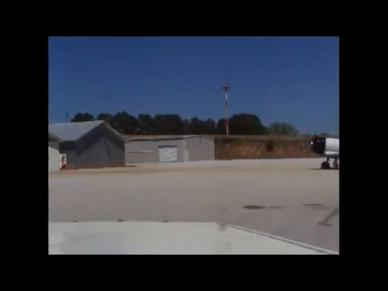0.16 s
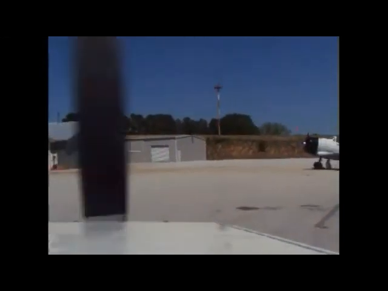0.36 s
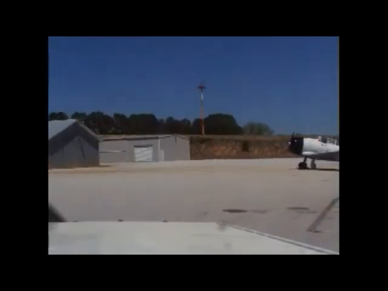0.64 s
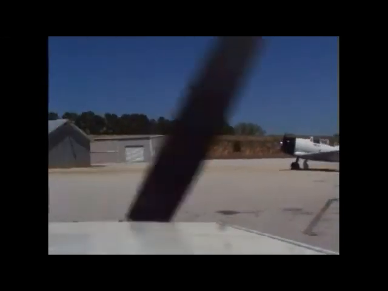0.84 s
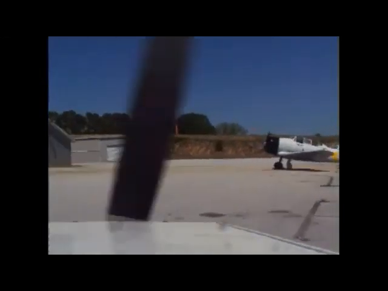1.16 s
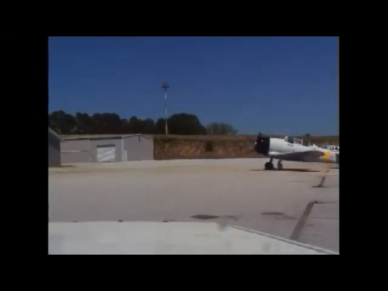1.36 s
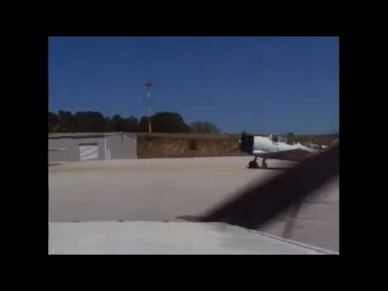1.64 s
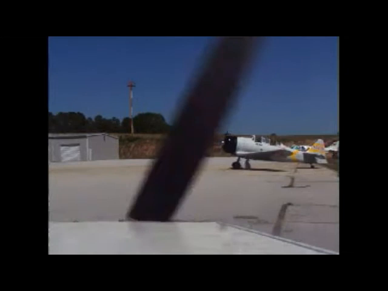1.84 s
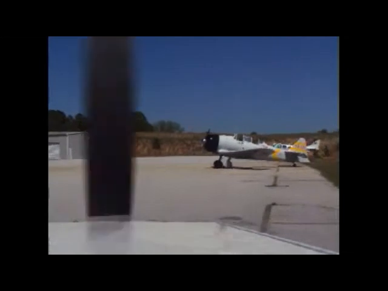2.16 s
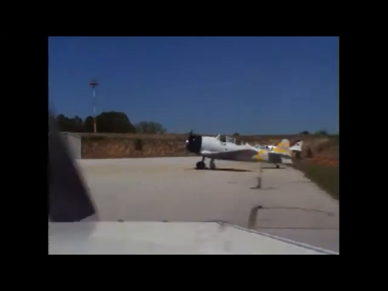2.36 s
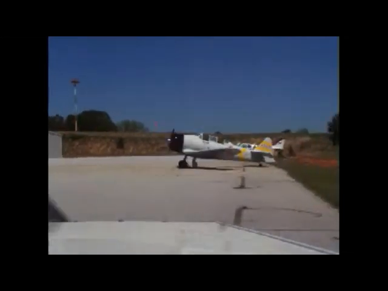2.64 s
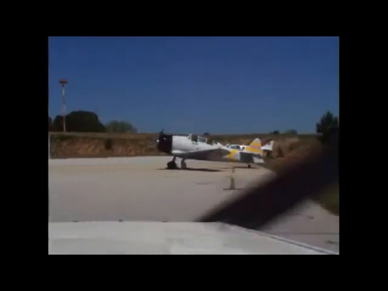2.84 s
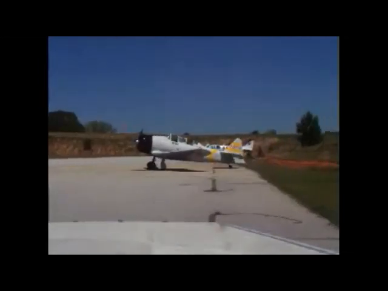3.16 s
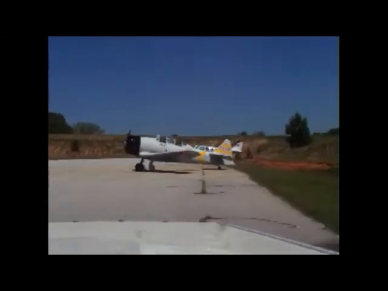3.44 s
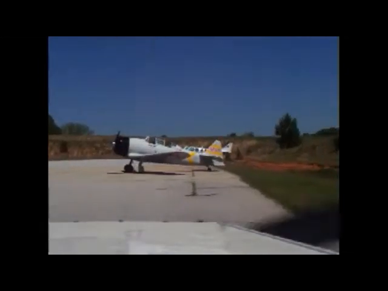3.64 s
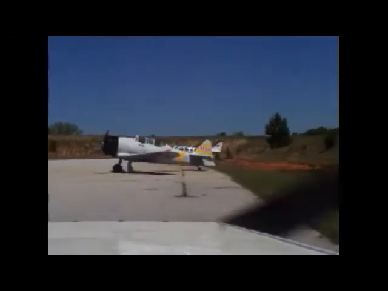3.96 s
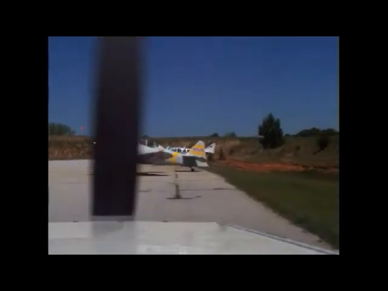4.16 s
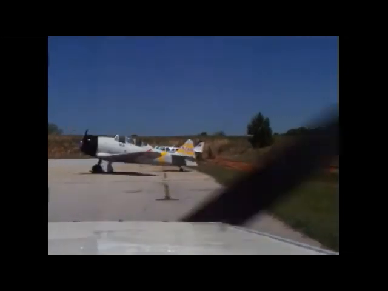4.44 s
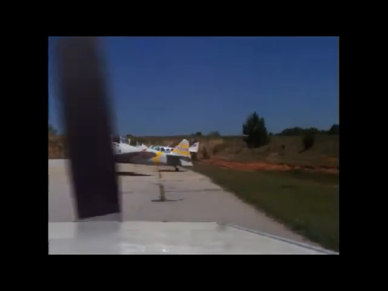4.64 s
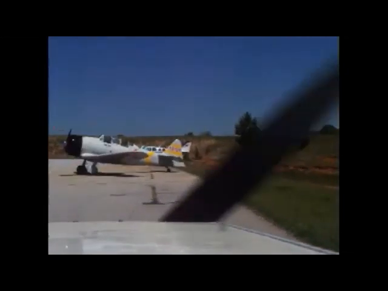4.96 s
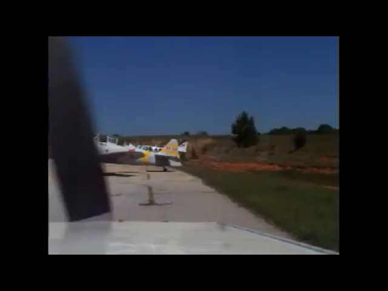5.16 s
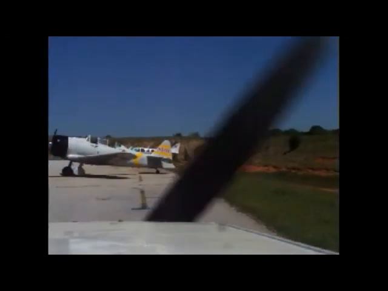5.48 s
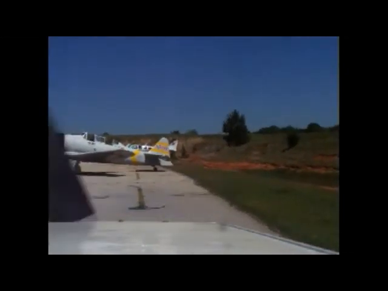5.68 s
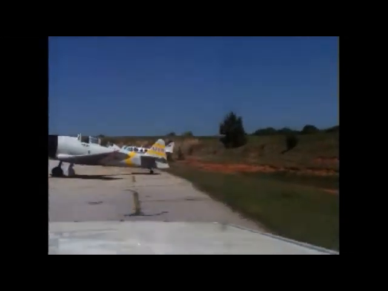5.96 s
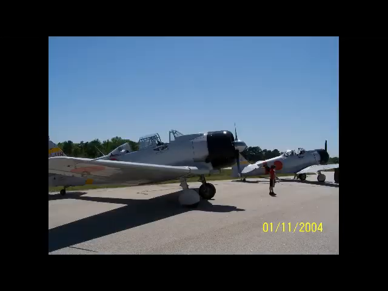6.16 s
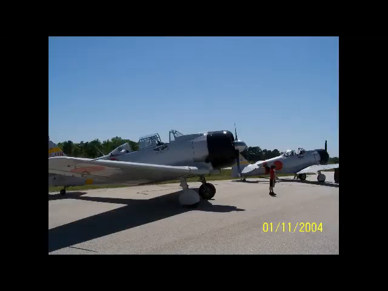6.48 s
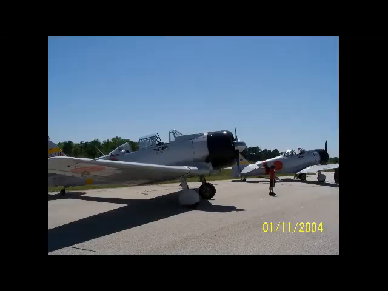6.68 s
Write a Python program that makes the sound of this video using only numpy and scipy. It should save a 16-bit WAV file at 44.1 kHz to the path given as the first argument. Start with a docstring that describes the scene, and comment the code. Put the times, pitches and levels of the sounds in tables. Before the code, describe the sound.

Inside a small aircraft's cabin, a four-cylinder engine runs at low taxi power, heard close through a small camera microphone. It chugs roughly, ringing pipes and buzzing panels over gassy propeller roar, with a sharp metallic clack about ten times a second. Its speed rises slightly at first, then holds steady until everything cuts to silence just after six seconds.

```python
"""Cabin of a small aircraft, heard at close range through a small camera's microphone.
Its four-cylinder engine idles at taxi power and gathers a little speed, then the sound stops dead.
One engine cycle is two shaft turns and repeats almost unchanged. Sine orders make the hum and throb,
decaying tones the ringing pipes and panels, shaped noise the gas and propeller roar,
and short bursts of random-signed noise in resonant metal the valve clacks."""
import sys
import numpy as np
from scipy import signal
from scipy.fft import rfft, irfft, next_fast_len
from scipy.io import wavfile
from scipy.ndimage import uniform_filter1d, map_coordinates

SR = 44100
rng = np.random.default_rng(int(sys.argv[2]) if len(sys.argv) > 2 else 0)


def waveform_to_disk(signal):
    """Save audio, clipped to [-1, 1], as 16-bit WAV at the path in sys.argv[1]."""
    frames = np.transpose(np.atleast_2d(signal))
    scaled = np.clip(frames, -1, 1) * 32767
    samples = np.round(scaled).astype(np.int16)
    wavfile.write(sys.argv[1], SR, samples)


N = 300409

# Mean engine speed: [t/s, cycle rate f/Hz]
ENGINE_SPEED = [(0.0, 9.121), (0.6, 9.296), (1.2, 9.424), (2.0, 9.519), (3.0, 9.597), (4.0, 9.643),
                (5.0, 9.652), (6.1, 9.639)]
# Low exhaust and propeller orders at settled speed: [multiple of the cycle rate, relative level/dB]
ORDERS_SETTLED = [(1, -31), (2, -18.5), (3, -18.5), (4, -4.5), (5, -6.5), (6, -12), (7, -0.5), (8, -3.5),
                  (9, -2), (10, -20), (11, 1), (12, -10.5), (13, -6), (14, -9), (15, 1), (16, -4),
                  (17, 2.5), (18, -13), (19, -10.5), (20, 1), (21, -4), (22, -10), (23, -21.5), (24, -6.5),
                  (25, -8), (26, -8), (27, -12.5), (28, -2), (29, -9), (30, -19.5), (31, -14.5),
                  (32, -16.5), (33, -28.5), (34, -14)]
# The same orders while the engine gathers speed: [multiple of the cycle rate, relative level/dB]
ORDERS_SLOW = [(1, -30.5), (2, -28.5), (3, -20.5), (4, -1), (5, -7.5), (6, -15), (7, -8.5), (8, -2.5),
               (9, 0), (10, -18.5), (11, -8.5), (12, 5), (13, -10.5), (14, -4.5), (15, 1.5), (16, 1.5),
               (17, 0.5), (18, -16), (19, -1), (20, -4.5), (21, -4.5), (22, -17), (23, -16.5), (24, -8.5),
               (25, -9), (26, -16), (27, -5.5), (28, 0.5), (29, -15), (30, -17.5), (31, -24.5), (32, -19),
               (33, -20), (34, -12.5)]
# Passage from the slow to the settled balance of orders: [t/s, share 0-1]
BALANCE_SHIFT = [(1.8, 0), (3.6, 1)]
# Pipes and panels, each sounded once a cycle:
# [place of the peak in the cycle 0-1, f/Hz, level before the engine level/dB, rise to the peak t/ms]
PIPES_AND_PANELS = [(.02, 500, -1, 3), (.085, 420, 5, 5), (.128, 500, -3, 2.5), (.23, 460, -2, 4.5),
                    (.34, 488, 5.5, 5), (.46, 500, -3, 3), (.55, 480, 4, 4), (.625, 425, 1.5, 4.5),
                    (.775, 428, 1.5, 4), (.83, 490, 1.5, 3.5), (.92, 425, .5, 4), (.31, 660, -3.5, 8),
                    (.392, 600, -9, 3.5), (.585, 660, -6, 6.5), (.80, 662, -10, 5), (.49, 740, -9, 5),
                    (.80, 742, -12, 5), (.055, 930, -6, 4), (.30, 935, -9, 5), (.575, 925, -2.5, 6),
                    (.815, 925, -5, 5), (.012, 1150, -7.5, 3.5), (.085, 1225, -5, 3.2),
                    (.165, 1205, -6, 3.5), (.26, 1170, -6, 3), (.307, 1140, -4, 3.5), (.523, 1170, -9, 2.2),
                    (.595, 1205, -3.5, 3.5), (.8156, 1197, 2.5, 6.5), (.88, 1235, -6, 3),
                    (.779, 1197, 8, .2), (.548, 1000, 2, .25), (.303, 1000, 2, .25), (.002, 1420, -8, 2),
                    (.072, 1370, -8, 3), (.215, 1450, -10, 2.3), (.56, 1370, -3.5, 2.8),
                    (.77, 1380, -10, 2), (.825, 1460, -11, 2), (.68, 1400, -12, 2), (.02, 1800, -14, 2),
                    (.12, 1800, -10, 1.7), (.228, 1780, -5.5, 2.4), (.46, 1730, -13, 3),
                    (.55, 1600, -10, 2.5), (.608, 1740, -9, 2), (.82, 1735, -10, 3), (.12, 1520, -11, 1.5),
                    (.02, 2600, -15, 3), (.235, 2550, -15, 3), (.488, 2600, -12, 1.2),
                    (.553, 2460, -6.5, 2.2), (.597, 2460, -6.5, 2), (.615, 2660, -8.5, 1.8),
                    (.66, 2660, -11, 1.6), (.74, 2570, -14, 1.5), (.78, 2460, -11, 2.5),
                    (.995, 3450, -11, 1.7), (.05, 3460, -11.5, 2), (.48, 3440, -14.5, 2),
                    (.555, 3450, -15, 1.8)]
# Weak firings of the loudest cylinder: [t/s, level change/dB]
WEAK_FIRINGS = [(2.28, -9), (2.385, -3.5)]
# Broad spectrum of gas and propeller wash: [f/Hz, relative density level/dB per Hz]
ROAR_SPECTRUM = [(15, -39.5), (32, -23.5), (60, -14.5), (160, -16.5), (300, -16.5), (460, -10.5),
                 (830, -18.5), (1100, -16.5), (1600, -23), (2500, -25), (4160, -35.5), (5700, -29.5),
                 (8200, -48.5), (15000, -64)]
# Cabin resonances and hollows in the roar: [f/Hz, width f/Hz, level change/dB]
CABIN_RESONANCES = [(152, 55, 3.5), (268, 20, 2.5), (330, 40, -4), (415, 60, 3), (565, 40, 6),
                    (632, 30, -5), (660, 20, 3), (705, 30, -6), (860, 70, -6), (925, 50, 4), (1195, 39, 5),
                    (1280, 30, -14), (1360, 69, 6), (1505, 40, 6), (1728, 44, 8), (1840, 40, -5),
                    (2010, 70, 3), (2370, 50, -5), (2460, 60, 6), (2590, 50, -5), (2665, 70, 6),
                    (3340, 70, 4.5), (3420, 40, -4), (3510, 79, 4.5), (4900, 60, 4), (4960, 30, -6),
                    (5010, 40, 6), (5200, 120, 4), (5340, 120, -4), (5600, 200, 5.5), (6080, 120, 4),
                    (6820, 60, -4), (6940, 220, 9)]
# How much of the roar comes alike in the next cycle: [f/Hz, power share 0-1]
REPEATING_SHARE = [(30, .1), (320, .15), (420, .25), (800, .25), (1200, .15), (2000, .1), (4000, .05)]
# Modes of the cylinder-head metal: [f/Hz, width f/Hz, level/dB]
METAL_MODES = [(3370, 180, -2), (4130, 120, -8), (4780, 330, -5.5), (5180, 140, 1.5), (5636, 210, 3),
               (5920, 530, -5), (6950, 230, -9)]
# Faint valve seatings in every cycle: [place in the cycle 0-1, drive level/dB, scatter level/dB]
FAINT_SEATINGS = [(.21, -23, 2.5), (.455, -24, 2.5), (.71, -28, 2.5)]
# Valve seatings that stand out: [t/s, peak level before the drive gain/dB]
LOUD_SEATINGS = [(0.0667, -14), (0.0942, -26), (0.175, -12.5), (0.2573, -25), (0.286, -14.5), (0.3127, -26),
                 (0.392, -15.5), (0.502, -15), (0.6095, -18), (0.7183, -14.5), (0.823, -20), (0.9292, -13),
                 (1.038, -13), (1.063, -25), (1.1438, -12.5), (1.1697, -27.5), (1.1962, -28), (1.2221, -23),
                 (1.251, -12), (1.3558, -17), (1.4621, -17), (1.4875, -20), (1.5135, -24.5),
                 (1.5678, -13.5), (1.5928, -20.5), (1.62, -24), (1.6727, -14), (1.7003, -18),
                 (1.778, -15.5), (1.8831, -15), (1.9876, -13), (2.0133, -24), (2.094, -17.5), (2.198, -13),
                 (2.3027, -15), (2.4082, -12), (2.4339, -22), (2.5122, -14.5), (2.5366, -30.5),
                 (2.5646, -28), (2.617, -14), (2.7216, -13.5), (2.7482, -21.5), (2.8272, -11.5),
                 (2.8509, -17.5), (2.9306, -11.5), (3.0353, -14), (3.1385, -16.5), (3.243, -12),
                 (3.3476, -15.5), (3.3727, -28), (3.452, -13.5), (3.5543, -16.5), (3.6594, -15),
                 (3.7638, -14.5), (3.8137, -25), (3.8675, -12.5), (3.9704, -15.5), (4.072, -15),
                 (4.0991, -21.5), (4.1265, -24.5), (4.1789, -13.5), (4.2817, -16.5), (4.3865, -14),
                 (4.438, -22.5), (4.4892, -16), (4.592, -18.5), (4.696, -11), (4.7997, -14.5),
                 (4.903, -17.5), (4.9282, -27), (5.008, -12), (5.0838, -26.5), (5.11, -15), (5.214, -14.5),
                 (5.3185, -12), (5.4212, -13), (5.4485, -23.5), (5.4799, -26), (5.5267, -12),
                 (5.628, -14.5), (5.7064, -27), (5.7324, -19.5), (5.8062, -25), (5.836, -14.5),
                 (5.941, -12), (5.9668, -30), (6.0437, -19)]
# Microphone and anti-alias filter: [f/Hz, level/dB]
MICROPHONE_RESPONSE = [(8, -30), (25, 0), (8250, -1.5), (8550, -16.5), (8700, -26.5), (8950, -30.5),
                       (9200, -13), (11000, -15), (12000, -26)]

START_CYCLE = -.6325  # cycle count at time zero; the loud valve seats near whole counts
ENGINE_DB, ENGINE_SAG_DB_PER_S = -16, 0.0576  # starting level and slow fall
HUM_ORDER = 5.38  # low hum geared to the shaft, as a multiple of the cycle rate
HUM_DB, HUM_EXTRA_DB, HUM_EASE_S = -40, 15.5, .6  # settled level, early extra, time constant
THROB_DB, THROB_EXTRA_DB, THROB_EASE_S = -6.5, -1, 1.7  # within the engine; extra dies away
ROAR_DB = -2.5  # within the engine
WEAK_REACH_S = .04  # either side of a weak firing
VALVE_JITTER_MS, RATTLE_RISE_S = 0.46, 0.0023
SEAT_DRIVE_DB, SEAT_LEAD_S = 8, 0.0018  # impact force over the heard peak; impacts start earlier
STOP_S, STOP_RAMP_S = 6.0982, .0002
TOP_HZ = 15300


def amp(db):
    """Level in dB to linear amplitude."""
    return 10 ** (np.asarray(db) / 20)


def unit(x):
    """Scale to an RMS of one."""
    return x / np.sqrt(np.mean(x ** 2) + 1e-20)


def curves(rows):
    """One value per sample for each column after the time."""
    seconds, *columns = np.transpose(rows)
    return [np.interp(np.arange(N) / SR, seconds, column) for column in columns]


def along(points, hz):
    """Read (f/Hz, value) points on a log frequency axis."""
    f, value = np.transpose(points)
    return np.interp(np.log(hz + 1), np.log(f + 1), value)


def wobble(rate):
    """A smooth random curve with rate knots a second."""
    knots = rng.standard_normal(int(N * rate / SR) + 4)
    return map_coordinates(knots, [np.arange(N) * rate / SR])


def eases(extra_db, ease_s):
    """An extra level that dies away exponentially as the engine settles."""
    return extra_db * np.exp(-np.arange(N) / SR / ease_s)


def filtered(x, response):
    """Multiply the spectrum of x by a response of frequency, padded against wrap-around."""
    m = next_fast_len(N + SR // 2)
    return irfft(rfft(x, m) * response(np.fft.rfftfreq(m, 1 / SR)), m)[..., :N]


def once_a_cycle(cycle, place, jitter_ms, scatter_db):
    """An impulse each time the engine passes one place, a little early or late, weak or strong."""
    turns = np.arange(np.floor(cycle[0]), cycle[-1]) + place
    chance = rng.standard_normal((len(turns), 2))
    at = np.interp(turns, cycle, np.arange(N)) + chance[:, 0] * jitter_ms * SR / 1000
    keep = (turns > cycle[0]) & (turns < cycle[-1])
    samples = np.clip(at[keep], 0, N - 1).astype(int)
    return np.bincount(samples, amp(scatter_db * chance[keep, 1]), N)


def shaft():
    """Integrated speed counts cycles; the shaft runs a little ahead or behind, quickly and slowly."""
    cycle = START_CYCLE + np.cumsum(curves(ENGINE_SPEED)[0]) / SR
    wander_ms = .1 * wobble(6) + .3 * wobble(1.2)
    return cycle + ENGINE_SPEED[-1][1] * wander_ms / 1000


def hum(cycle):
    """A slightly unsteady low sine that follows the shaft, stronger at first."""
    level_db = HUM_DB + eases(HUM_EXTRA_DB, HUM_EASE_S) + 0.99 * wobble(4.0)
    return np.sqrt(2) * amp(level_db) * np.sin(2 * np.pi * HUM_ORDER * cycle)


def throb(cycle):
    """Low exhaust and propeller orders shift balance as the speed settles, and each drifts a little."""
    start_phase = rng.uniform(0, 2 * np.pi, len(ORDERS_SETTLED))
    settled = np.clip(curves(BALANCE_SHIFT)[0], 0, 1)
    total = np.zeros(N)
    for (order, slow_db), (_, fast_db), phase in zip(ORDERS_SLOW, ORDERS_SETTLED, start_phase):
        level_db = slow_db + settled * (fast_db - slow_db) + 1.0 * wobble(2)
        total += amp(level_db) * np.sin(2 * np.pi * order * cycle + phase)
    return unit(total)


def rings(cycle):
    """Every blowdown or knock drives its pipe or panel for a few ms: the tone swells, then dies."""
    t, out = np.arange(SR // 10) / SR, np.zeros(N)
    seconds = np.arange(N) / SR
    weak = amp(sum(db * (abs(seconds - s) < WEAK_REACH_S) for s, db in WEAK_FIRINGS))
    for place, hz, db, peak_ms in PIPES_AND_PANELS:
        u = 1000 * t / peak_ms
        swell = (u * np.exp(1 - u)) ** 2
        ring = amp(db) * swell * np.sin(2 * np.pi * hz * t)
        start = place - peak_ms * ENGINE_SPEED[-1][1] / 1000  # the peak falls on its place
        loose_db = .4 + hz / 1800  # light, high-pitched parts rattle less evenly
        blows = once_a_cycle(cycle, start, jitter_ms=.06, scatter_db=loose_db)
        if .76 < place < .88:  # the loudest cylinder's part of the cycle
            blows = blows * weak
        out += signal.fftconvolve(blows, ring)[:N]
    return out


def clatter(cycle, size=2048, count=5):
    """White noise tied to the shaft: a pattern of small knocks returns and changes over a few cycles."""
    knocks = rng.standard_normal((int(cycle[-1]) + 3, size))
    pattern = uniform_filter1d(knocks, count, axis=0).ravel()
    return unit(pattern[((cycle + 1) * size).astype(int)])


def roar(cycle):
    """Shaft clatter, turbulent gas and propeller wash in the cabin resonances swell with each firing."""
    puff = amp(0.84 * np.cos(2 * np.pi * (4 * cycle - .12)) + 0.2 * wobble(12))
    # each knock lasts a few samples, which lifts its density
    held = np.sqrt(2048 * np.mean(np.diff(cycle)))

    def response(hz):
        resonance_db = sum(db / (1 + (2 * (hz - centre) / width) ** 2)
                           for centre, width, db in CABIN_RESONANCES)
        colour = amp(along(ROAR_SPECTRUM, hz) + resonance_db)
        share = along(REPEATING_SHARE, hz)
        return colour * [held * np.sqrt(share), np.sqrt(1 - share)]

    repeating_and_free = np.array([clatter(cycle), rng.standard_normal(N)])
    return unit(filtered(puff * repeating_and_free, response).sum(axis=0))


def valves(cycle):
    """Each seating valve is a few-ms burst of small impacts in the metal of the cylinder head."""
    faint = sum(amp(db) * once_a_cycle(cycle, place, VALVE_JITTER_MS, scatter_db)
                for place, db, scatter_db in FAINT_SEATINGS)
    seconds, peak_db = np.transpose(LOUD_SEATINGS)
    samples = ((seconds - SEAT_LEAD_S) * SR).astype(int)
    loud = np.bincount(samples, amp(peak_db + SEAT_DRIVE_DB), N)
    u = np.arange(SR // 20) / SR / RATTLE_RISE_S
    rattle = np.abs(signal.fftconvolve(faint + loud, u * np.exp(1 - u))[:N])
    impacts = rattle * np.sign(rng.standard_normal(N))

    def metal(f):
        # neighbouring modes have opposite sign
        return sum((-1) ** k * amp(db) * 1j * f * width / (centre ** 2 - f * f + 1j * f * width)
                   for k, (centre, width, db) in enumerate(METAL_MODES))

    return filtered(impacts, metal)


def scene():
    """The engine body sags slowly in level under the steadily placed valves and hum."""
    cycle = shaft()
    low_hum = hum(cycle)
    throb_db = THROB_DB + eases(THROB_EXTRA_DB, THROB_EASE_S)
    body = amp(throb_db) * throb(cycle) + rings(cycle) + amp(ROAR_DB) * roar(cycle)
    engine_db = ENGINE_DB - ENGINE_SAG_DB_PER_S * np.arange(N) / SR
    return (amp(engine_db) * body + valves(cycle) + low_hum)[None]


def record(dry):
    """The microphone path passes only a faint fizz above its edge; the sound is later cut off hard."""
    heard = filtered(dry, lambda hz: amp(along(MICROPHONE_RESPONSE, hz)))
    cut = heard * np.clip((STOP_S - np.arange(N) / SR) / STOP_RAMP_S, 0, 1)
    lowpass = signal.ellip(10, .3, 70, TOP_HZ, fs=SR, output="sos")
    return signal.sosfilt(lowpass, cut)


dry = scene()
out = record(dry)
waveform_to_disk(out)
```